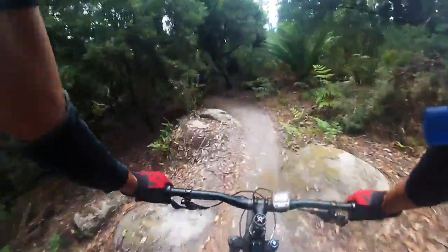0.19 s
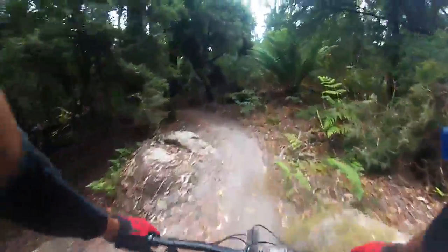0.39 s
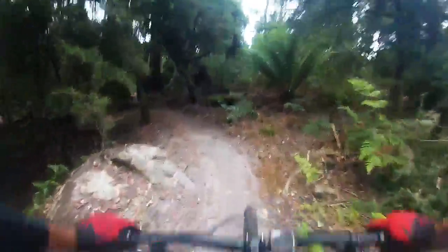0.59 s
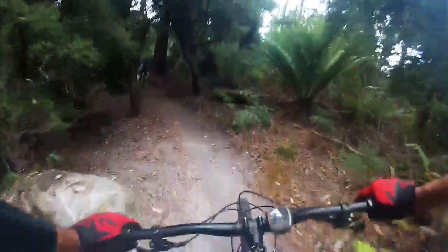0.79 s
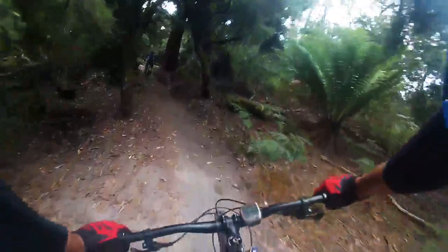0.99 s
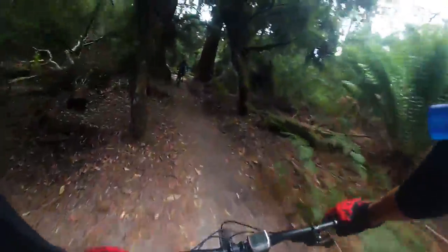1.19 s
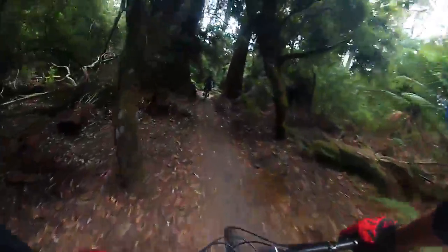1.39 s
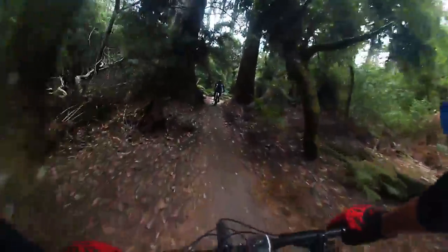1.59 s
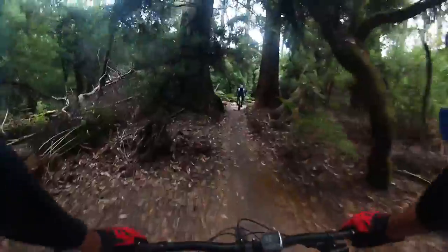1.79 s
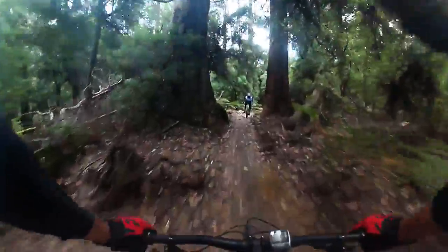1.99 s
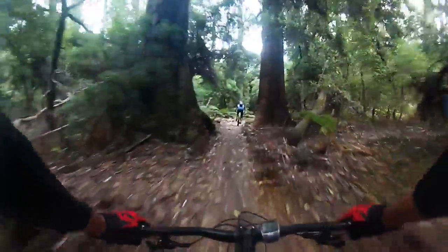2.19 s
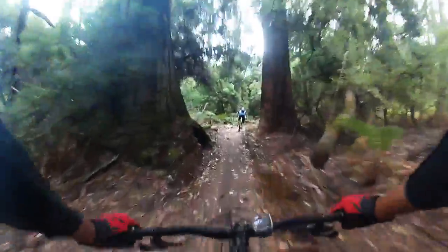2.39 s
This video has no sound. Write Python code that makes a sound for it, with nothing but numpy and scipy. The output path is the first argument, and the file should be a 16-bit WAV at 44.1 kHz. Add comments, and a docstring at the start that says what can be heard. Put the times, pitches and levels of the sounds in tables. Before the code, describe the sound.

Mountain bike tyres rumble and grit along a dirt forest trail, with one hard knock

```python
"""A dirt trail, heard from inside a small camera housing on the chest of a rolling mountain bike's rider.
Jolts are leaking pressure pulses over a low rumble of shaped noise; one hard knock is a blunt pulse with
dying modes, and it makes a limiter duck everything for a moment. Tyre grit is dense random grains ringing
the housing's resonances under a smoother hiss, dirt crunches are swells of band noise, cables and chain
tick as short noise bursts, and faint thin tones whine behind."""
import sys
import numpy as np
from scipy import signal
from scipy.fft import rfft, irfft
from scipy.io import wavfile

SR = 44100
rng = np.random.default_rng(int(sys.argv[2]) if len(sys.argv) > 2 else 0)


def waveform_to_disk(signal):
    """Save audio, clipped to [-1, 1], as 16-bit WAV at the path in sys.argv[1]."""
    frames = np.transpose(np.atleast_2d(signal))
    scaled = np.clip(frames, -1, 1) * 32767
    samples = np.round(scaled).astype(np.int16)
    wavfile.write(sys.argv[1], SR, samples)


def convert_level_to_amplitude(level_db):
    """Map a level in decibels to its linear amplitude factor."""
    exponent = np.asarray(level_db, float) / 20
    return 10 ** exponent


N = 108045


def time():
    """Sampling instants in seconds."""
    return np.arange(N) / SR


def rms_one(x):
    """Normalisation to unit mean power."""
    return x / np.sqrt(np.mean(x ** 2) + 1e-20)


def in_time(rows):
    """Linear interpolation in time of every column after the first, which holds seconds."""
    s, *columns = np.transpose(rows)
    return [np.interp(time(), s, column) for column in columns]


def drift(rate_hz):
    """Slow random fluctuation of rms 1: white noise through two equal low-pass poles at rate_hz."""
    hop = 40   # samples between the slow values
    r = np.exp(-2 * np.pi * rate_hz * hop / SR)
    noise = rng.standard_normal(N // hop + 2002)
    slow = signal.lfilter([1], [1, -2 * r, r * r], noise)[2000:]   # without the filter's start
    return np.interp(np.arange(N) / hop, np.arange(len(slow)), rms_one(slow))


def coloured(spectrum):
    """Coloured noise of rms 1: white noise weighted in frequency by rows of (Hz, relative dB)."""
    hz, db = np.transpose(spectrum)
    log_hz = np.log(np.fft.rfftfreq(N, 1 / SR) + 1)
    weight = convert_level_to_amplitude(np.interp(log_hz, np.log(hz), db))
    return rms_one(irfft(rfft(rng.standard_normal(N)) * weight, N))


def resonate(x, hz, width_hz):
    """Damped resonance: the pole radius sets the bandwidth, and the peak gain is about 1."""
    r = np.exp(-np.pi * width_hz / SR)
    zeros = np.array([1, 0, -1]) * (1 - r * r) / 2
    return signal.lfilter(zeros, [1, -2 * r * np.cos(2 * np.pi * hz / SR), r * r], x)


def housing(x, patchy_db=0):
    """Modal superposition: parallel case resonances of alternating sign, each swelling on its own."""
    # resonances of the case. Each row: frequency in Hz, bandwidth in Hz, gain in dB
    modes = [(516, 58, -9.5), (1100, 390, -20.5), (1305, 132, 4), (1452, 159, 5), (1984, 202, 2.5),
             (2264, 278, 3), (3484, 247, -9.5), (4010, 320, -17), (4950, 57, -11), (5680, 166, -13),
             (6580, 270, -17.5)]
    total = 0
    for k, (hz, width_hz, db) in enumerate(modes):
        gain = convert_level_to_amplitude(db + patchy_db * drift(12.6))
        total = total + gain * (-1) ** k * resonate(x, hz, width_hz)
    return total


def jolts():
    """Pressure leakage: a first-order high-pass lets each Gaussian push leak away and rebound."""
    vent_hz = 6.2   # the housing leaks pressure below this
    # strongest jolts through the mount. Each row: centre in seconds, signed pressure before the leak,
    # half-width (standard deviation) in seconds
    pushes = [(0.068, 0.09, 0.011), (0.113, -0.052, 0.0036), (.226, 0.16, 0.0061), (0.25, -0.053, 0.0035),
              (0.297, 0.19, 0.0029), (0.311, -0.076, 0.016), (0.407, -0.22, 0.0079), (0.512, 0.12, 0.005),
              (0.535, 0.17, 0.004), (0.607, -0.086, 0.0017), (0.67, 0.21, 0.016), (0.679, 0.22, 0.0028),
              (0.686, .14, 0.0021), (0.867, -0.22, 0.0043), (0.919, 0.041, 0.0097), (1.044, -0.19, 0.0036),
              (1.056, 0.071, 0.0049), (1.077, -0.097, 0.0058), (1.43, .13, 0.004), (1.671, -0.082, 0.011),
              (1.785, -0.11, 0.0074), (1.798, -0.084, 0.0027), (1.81, 0.021, 0.0024),
              (1.833, -0.096, 0.0057), (1.854, 0.043, 0.0091), (1.987, 0.049, 0.004),
              (2.013, -0.041, 0.011), (2.039, 0.013, 0.0035), (2.098, 0.042, 0.0055),
              (2.174, 0.055, 0.0023), (2.193, 0.11, 0.0033), (2.209, -0.042, 0.0032), (2.428, 0.086, 0.01)]
    pressure = sum(size * np.exp(-.5 * ((time() - s) / width) ** 2) for s, size, width in pushes)
    return signal.sosfilt(signal.butter(1, vent_hz, "high", fs=SR, output="sos"), pressure)


def knock():
    """Impulsive excitation: a big, blunt push on the case sets its lowest modes into decaying ringing."""
    start_s, rise_s, fall_s = .6979, 0.0038, 0.0066
    ring_lead_s = 0.00055   # the ringing starts this much before the push
    top_hz = 2804           # low-pass stop-band edge
    # ringing modes. Each row: frequency in Hz, starting level in dB, decay time over 60 dB in seconds
    ringing = [(2138, -10, 0.013), (1840, -16.5, 0.011), (1438, -10.5, 0.01), (1100, -30.5, 0.019),
               (586, -17.5, 0.017)]
    t = np.maximum(time() - start_s, 0)
    push = -2.28 * (1 - np.exp(-t / rise_s)) * np.exp(-t / fall_s)
    t = np.maximum(time() - start_s + ring_lead_s, 0)
    ring = sum(convert_level_to_amplitude(db - 60 * t / t60) * np.sin(2 * np.pi * hz * t) for hz, db, t60 in ringing)
    blunt = signal.cheby2(6, 35, top_hz, fs=SR, output="sos")
    return signal.sosfilt(blunt, push + ring + 1e-18)


def rumble():
    """Band-split random vibration: low noise whose lower and upper parts fluctuate independently."""
    # noise spectrum. Each row: frequency in Hz, relative density in dB per Hz
    spectrum = [(8.8, -19.5), (15, 4), (29, -9), (64, -17), (102, -20.5), (200, -33.5), (336, -39.5),
                (513, -42.5), (900, -50), (1150, -41.5), (2200, -80)]
    # shaking levels. Each row: time in seconds, mid level of the lower part in dB, of the upper part in dB
    shaking = [(0, -22, -66), (.05, -39, -60), (.3, -30.5, -64), (.5, -32, -60), (.62, -29.5, -52.5),
               (.7, -23.5, -52), (.86, -31.5, -53.5), (1., -37.5, -59.5), (1.1, -38.5, -60.5),
               (1.17, -36, -59.5), (1.3, -37, -60.5), (1.55, -31, -60.5), (1.8, -35.5, -64),
               (2.05, -36, -60), (2.3, -35.5, -61.5), (2.45, -35, -60)]
    low_db, high_db = in_time(shaking)
    noise = coloured(spectrum)
    low = signal.sosfiltfilt(signal.butter(2, 150, fs=SR, output="sos"), noise)
    lower = rms_one(low) * convert_level_to_amplitude(low_db + 2.8 * drift(5.2))
    upper = rms_one(noise - low) * convert_level_to_amplitude(high_db + 1.8 * drift(10.0))
    return lower + upper


def grit():
    """Random impact excitation: dense tyre grains ring the housing, and a smoother hiss shares their lumps."""
    grains_per_s, spread_db = 8000, 3
    # tyre grit. Each row: time in seconds, mid level of the grains in dB, of the treble hiss in dB
    levels = [(0, -59, -62.5), (.15, -55.5, -64), (.25, -55.5, -62), (.4, -58.5, -63.5), (.5, -52.5, -63.5),
              (.6, -49.5, -64), (.67, -53, -60), (.697, -39, -49), (.72, -59, -70), (.78, -55, -63),
              (.82, -54.5, -63), (.85, -55.5, -63), (1.06, -52.5, -61.5), (1.115, -57, -64),
              (1.16, -52.5, -62.5), (1.27, -57.5, -62.5), (1.31, -52.5, -61), (1.38, -54.5, -62.5),
              (1.43, -52.5, -60.5), (1.6, -53.5, -61.5), (1.85, -57.5, -60.5), (2.1, -58.5, -62.5),
              (2.3, -57, -61.5), (2.36, -57, -60.5), (2.45, -61, -64)]
    # hiss spectrum. Each row: frequency in Hz, relative density in dB per Hz
    hiss_spectrum = [(1650, 2.5), (2800, -51), (3470, -3), (3830, -3), (5640, 3.5), (8360, -5),
                     (10100, -5.5), (15400, -11)]
    grain_db, hiss_db = in_time(levels)
    lumps = drift(40)
    excess_db = spread_db * np.minimum(rng.exponential(1, N), 5)
    sizes = convert_level_to_amplitude(excess_db) * rng.choice([-1, 1], N)
    impacts = sizes * (rng.random(N) < grains_per_s / SR)
    grains = rms_one(housing(impacts + 1e-18, patchy_db=0.57))
    hiss = coloured(hiss_spectrum)
    return grains * convert_level_to_amplitude(grain_db + 1.43 * lumps) + hiss * convert_level_to_amplitude(hiss_db + 1.44 * lumps)


def crunches():
    """Band-limited noise: two equal resonances give each dull swell under the tyres a rough pitch."""
    q, rise_s = 3.5, 0.005   # q is centre over width of each resonance
    # crunches. Each row: start in seconds, rms level in dB before rise and decay, centre in Hz,
    # decay time over 60 dB in seconds
    swells = [(.605, -39.5, 353, 0.077), (.612, -55.5, 3880, 0.13), (.633, -40, 1200, .05),
              (.672, -36, 780, 0.06), (.674, -24, 1410, 0.027), (.676, -33, 3430, 0.033),
              (.846, -39, 301, 0.095), (.931, -46, 540, .06), (.936, -43, 1150, 0.048),
              (1.082, -48.5, 540, 0.032), (1.137, -43, 1100, 0.044), (1.139, -45, 474, 0.051),
              (1.296, -45.5, 1920, 0.12), (1.353, -41, 1960, 0.11), (2.346, -42.5, 1440, 0.069),
              (2.381, -43, 1400, .055)]
    out, span = np.zeros(N + 6000), np.arange(6000) / SR
    for s, db, hz, t60 in swells:
        noise = rng.standard_normal(len(span))
        band = rms_one(resonate(resonate(noise, hz, hz / q), hz, hz / q))
        envelope = (1 - np.exp(-span / rise_s)) * convert_level_to_amplitude(db - 60 * span / t60)
        out[int(s * SR):][:len(span)] += band * envelope
    return out[:N]


def ticks():
    """Transient excitation: short dying noise bursts sound around a centre and partly ring the housing."""
    q, rise_s = 4.2, 0.00077   # q is centre over width of each resonance
    tone_db, broad_db, body_db = -4, -8, 6   # gains of the narrow, broad and housing parts
    broad_width_hz = 10800
    # ticks of cables and chain. Each row: start in seconds, level in dB, centre in Hz,
    # decay time over 60 dB in seconds, share in the housing in dB before its common gain
    taps = [(.1042, -43.5, 6760, 0.026, -15), (.2404, -54, 6200, 0.048, 17.5), (.274, -53, 5500, 0.015, 19),
            (0.323, -38.5, 6000, 0.038, 5.5), (0.5776, -28, 6100, 0.018, -15),
            (.586, -36, 6000, 0.022, -13), (0.6754, -33, 4480, 0.032, 9), (0.6835, -64, 5030, 0.0085, 3),
            (.6912, -56, 6000, 0.0065, -1), (0.6993, -27, 6300, 0.015, 3), (.7475, -44, 5000, 0.016, 2),
            (0.863, -56, 4380, 0.039, 21), (1.038, -55.5, 5070, 0.018, 22), (1.068, -51, 6150, 0.13, -14),
            (1.263, -53, 9400, .02, -10), (1.736, -30, 5450, 0.0062, -17), (1.872, -54, 10500, 0.024, -10),
            (2.172, -40, 6000, 0.039, -17), (2.2418, -53, 8500, 0.018, -3),
            (2.286, -49.5, 9500, 0.035, -10), (2.343, -50.5, 4950, 0.062, 9.5)]
    out, body, span = np.zeros(N), np.zeros(N), np.arange(3000) / SR
    for s, db, hz, t60, share_db in taps:
        envelope = (1 - np.exp(-span / rise_s)) * convert_level_to_amplitude(db - 60 * span / t60)
        burst = rng.standard_normal(len(span)) * envelope
        tone = resonate(resonate(burst, hz, hz / q), hz, hz / q)
        at = slice(int(s * SR), int(s * SR) + len(span))
        out[at] += tone / np.abs(tone).max() * convert_level_to_amplitude(db + tone_db)
        out[at] += convert_level_to_amplitude(broad_db) * resonate(burst, hz, broad_width_hz)
        body[at] += burst * convert_level_to_amplitude(share_db + body_db)
    return out + housing(body + 1e-18)


def whine():
    """Frequency modulation: the phase of each thin sine integrates a slightly wavering frequency."""
    waver_hz = 3   # rms
    # faint tones. Each row: mean frequency in Hz, rms level in dB
    tones = [(6955, -82), (7014, -83), (10429, -86), (10490, -84), (11747, -91), (13965, -91)]
    total = 0
    for hz, db in tones:
        phase = 2 * np.pi * np.cumsum(hz + waver_hz * drift(4.5)) / SR
        total = total + convert_level_to_amplitude(db) * np.sqrt(2) * np.sin(phase)
    return total


def scene():
    """Linear superposition of all sources in one channel."""
    return (jolts() + knock() + rumble() + grit() + crunches() + ticks() + whine())[None]


def roll_off(x):
    """The treble ends steeply here."""
    return signal.sosfilt(signal.butter(12, 15600, fs=SR, output="sos"), x)


def record(dry):
    """Dynamic range limiting: lagging gain reduction after loud peaks, then soft saturation and a low-pass."""
    limit_db, duck_ratio = -10, 1.44   # threshold; dB of ducking per dB above it
    attack_s, release_db_per_s = 0.0044, 97
    clip, cutoff_hz = 1.65, 15650      # saturation ceiling; low-pass stop-band edge
    level_db = 20 * np.log10(np.abs(dry[0]) + 1e-9)
    over_db = np.maximum(level_db - limit_db, 0) * duck_ratio
    # the highest reduction so far holds, falling steadily
    fall_db = release_db_per_s * time()
    held_db = np.maximum.accumulate(over_db + fall_db) - fall_db
    r = np.exp(-1 / (attack_s * SR))
    duck_db = signal.lfilter([(1 - r) ** 2], [1, -2 * r, r * r], held_db)
    clipped = clip * np.tanh(dry * convert_level_to_amplitude(-duck_db) / clip)
    mix = signal.sosfilt(signal.cheby2(20, 40, cutoff_hz, fs=SR, output="sos"), clipped)
    return roll_off(mix)


dry = scene()
out = record(dry)
waveform_to_disk(out)
```